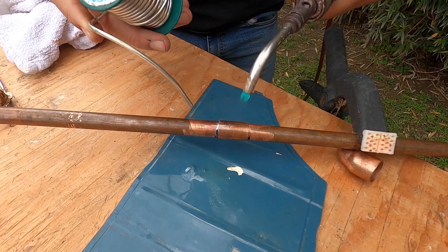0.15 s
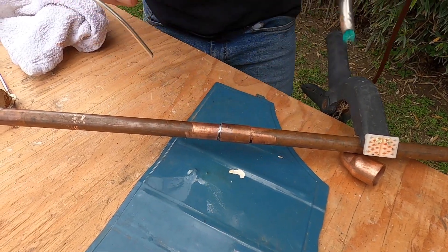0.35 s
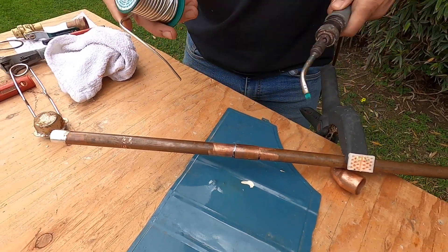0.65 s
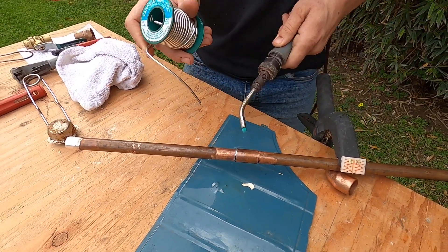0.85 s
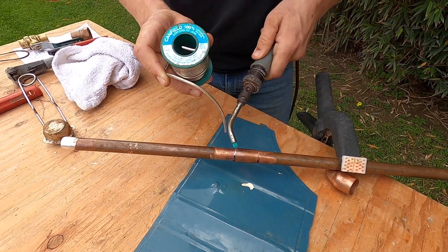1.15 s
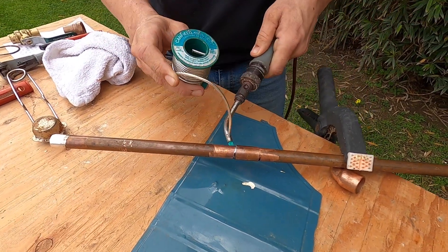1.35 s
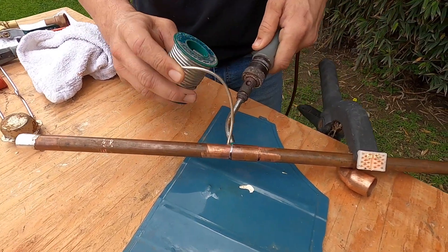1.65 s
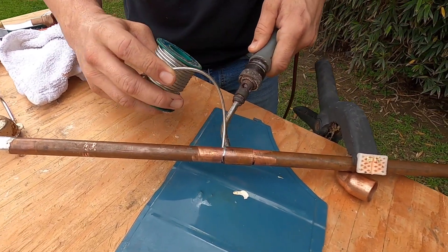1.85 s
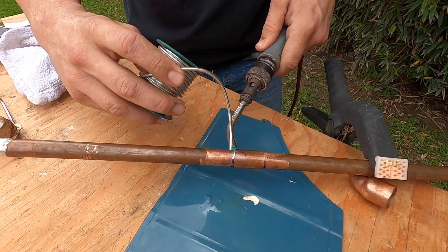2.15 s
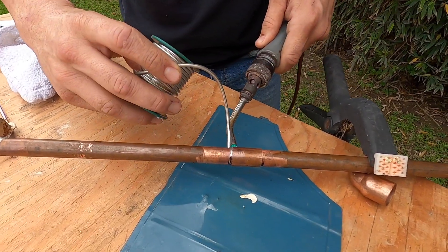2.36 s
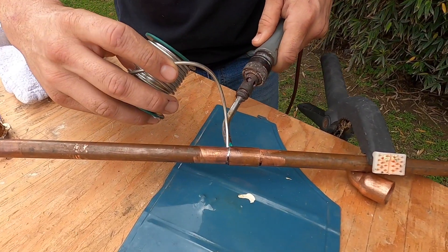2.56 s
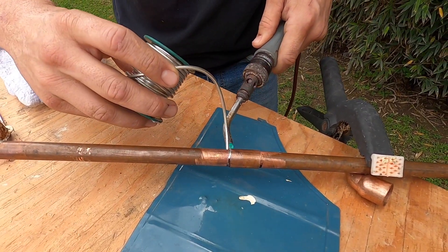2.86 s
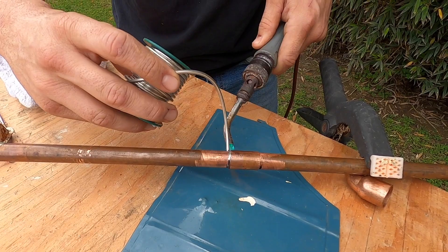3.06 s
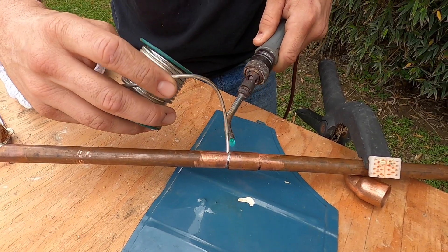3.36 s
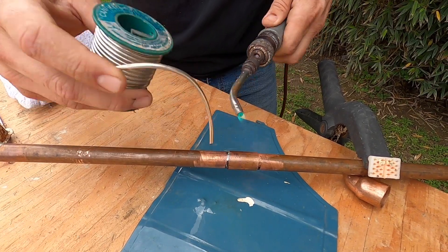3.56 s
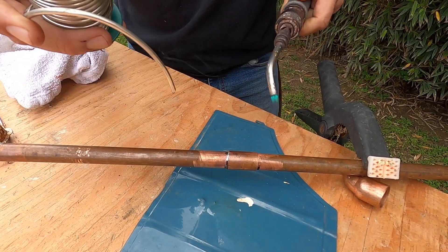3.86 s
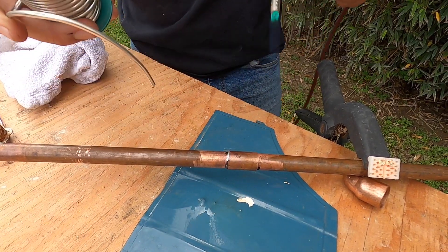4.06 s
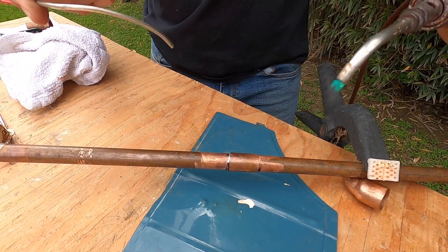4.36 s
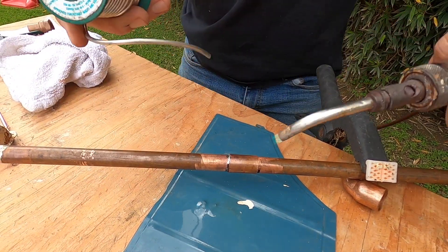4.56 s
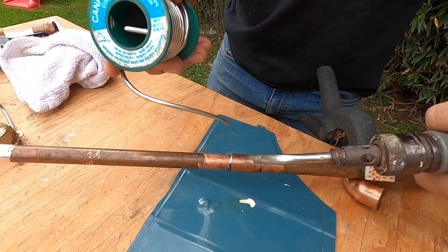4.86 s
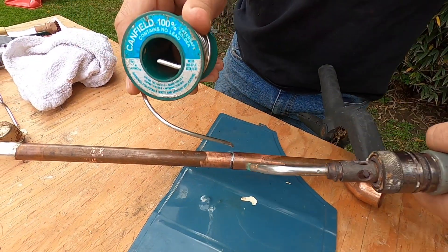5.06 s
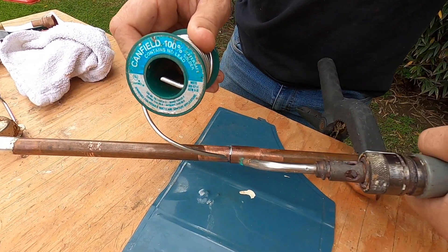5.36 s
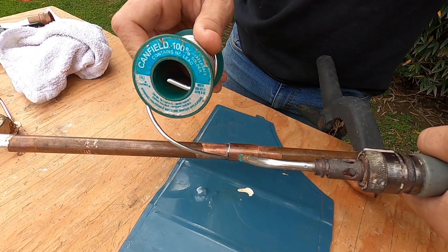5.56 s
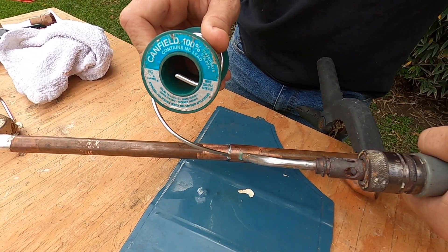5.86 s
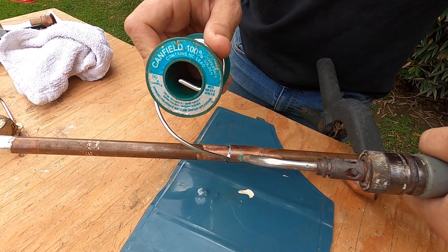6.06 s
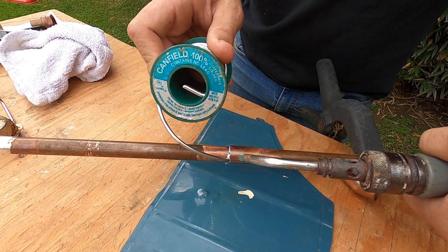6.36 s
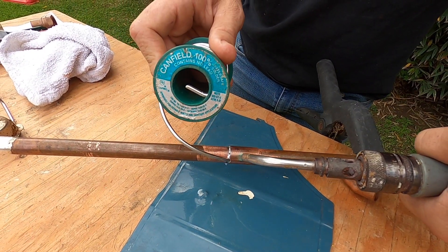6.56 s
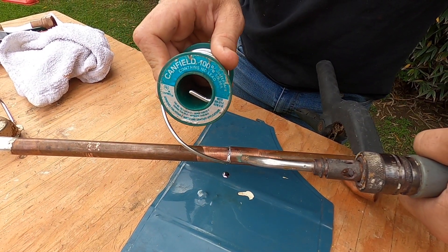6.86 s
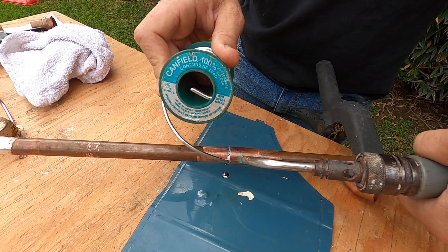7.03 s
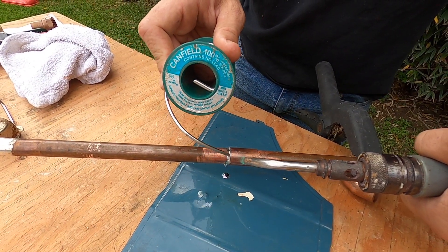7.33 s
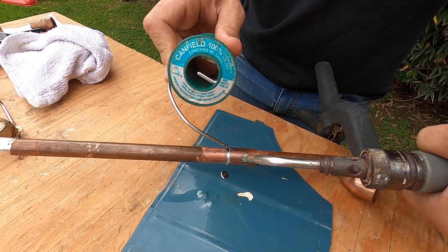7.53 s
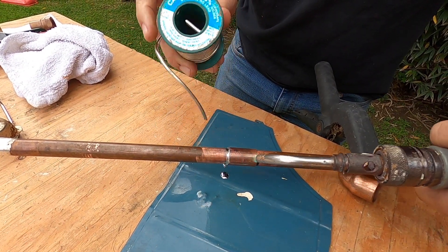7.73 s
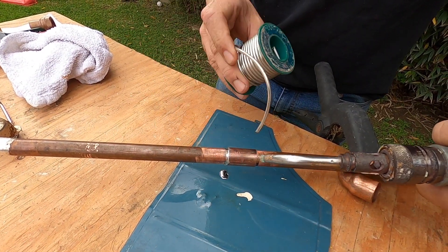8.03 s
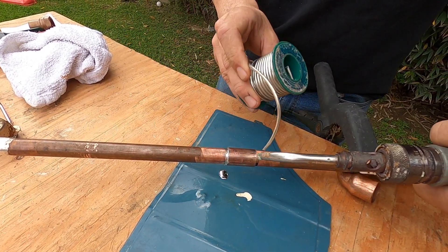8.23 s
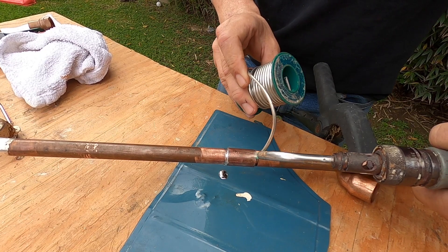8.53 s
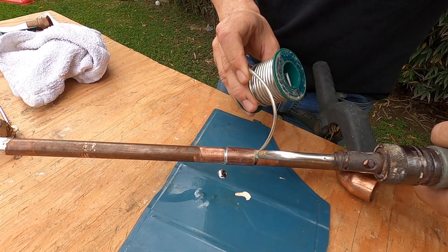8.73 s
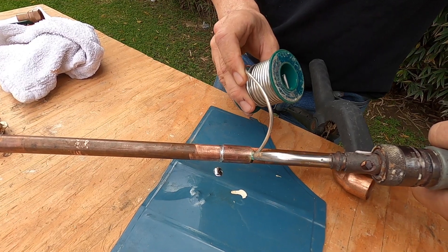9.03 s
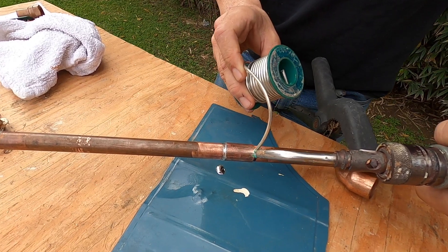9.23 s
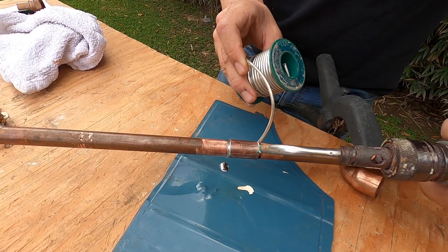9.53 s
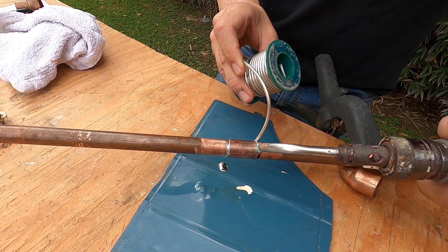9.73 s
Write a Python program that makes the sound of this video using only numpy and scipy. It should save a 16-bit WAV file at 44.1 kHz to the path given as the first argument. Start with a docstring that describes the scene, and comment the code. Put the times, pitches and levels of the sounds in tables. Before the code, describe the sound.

A gas torch hisses steadily while heating a copper pipe outdoors, its hollow tone shifting as it moves.

```python
"""Outdoors at a plywood bench, a gas torch heats a copper pipe joint.
The jet hisses and whistles through the resonances of the burner tube, shifting between hollow
colourings; its echo off the bench sweeps a comb through the hiss whenever the torch is lifted.
The flame puffs as it moves through the air and roars when held on the pipe. A light breeze
rumbles on a pair of close microphone ports."""
import sys
import numpy as np
from scipy import signal
from scipy.fft import rfft, irfft
from scipy.io import wavfile
from scipy.ndimage import map_coordinates

SR = 44100
rng = np.random.default_rng(int(sys.argv[2]) if len(sys.argv) > 2 else 0)


def generate_wav(signal):
    """Clip the signal to [-1, 1] and save it as 16-bit WAV at the path in sys.argv[1]."""
    frames = np.transpose(np.atleast_2d(signal))
    scaled = np.clip(frames, -1, 1) * 32767
    pcm = np.round(scaled).astype(np.int16)
    wavfile.write(sys.argv[1], SR, pcm)


N = 436149
TIME = np.arange(N) / SR
HZ = np.maximum(np.fft.rfftfreq(N, 1 / SR), 1)


def from_db(db):
    """Decibels to gain."""
    return 10 ** (np.asarray(db) / 20)


def in_time(rows):
    """Breakpoints to automation curves, one per column after the time."""
    times, *columns = np.transpose(rows)
    return [np.interp(TIME, times, column) for column in columns]


def over_hz(points):
    """Breakpoints joined by straight lines on a log-frequency axis."""
    hz, value = np.transpose(points)
    return np.interp(np.log(HZ), np.log(hz), value)


def peaks_db(rows):
    """An EQ curve of bells from (centre [Hz], width [Hz], gain [dB])."""
    return sum(db / (1 + (2 * (HZ - hz) / width) ** 2) for hz, width, db in rows)


def filtered(x, gain):
    """Apply a gain per frequency."""
    return irfft(rfft(x) * gain, N)


def delayed(x, lag_ms):
    """A moving delay on both channels."""
    read_at = np.arange(N) - lag_ms * SR / 1000
    return np.array([map_coordinates(side, [read_at], order=3, mode="nearest") for side in x])


def drift(rate_hz):
    """A smooth random wobble with a standard deviation of 1."""
    hop, settle = 40, 2000
    pole = np.exp(-2 * np.pi * rate_hz * hop / SR)
    white = rng.standard_normal(N // hop + settle + 2)
    slow = signal.lfilter([1], [1, -2 * pole, pole * pole], white)[settle:]
    return np.interp(np.arange(N) / hop, np.arange(len(slow)), slow / slow.std())


def turbulence(density_db):
    """Noise of a given level per Hz at both ports, partly shared and partly scattered."""
    # how alike the two ports sound: (frequency [Hz], correlation [0-1])
    likeness = [(60, .9), (450, .98), (1500, .97), (3000, .92), (4000, .9), (4400, .76), (5400, .88),
                (5800, .82), (6200, .998), (6850, .998), (7400, .5), (8200, .65), (10500, .55), (13000, .3)]
    alike = np.clip(over_hz(likeness), 0, .998)
    shared, scattered = rfft(rng.standard_normal((2, N))) * np.sqrt(SR / 2) * from_db(density_db)
    mid = np.sqrt((1 + alike) / 2) * shared
    side = np.sqrt((1 - alike) / 2) * scattered
    return irfft(np.array([mid + side, mid - side]), N)


def jet(body_db, hiss_db, split_hz=4000, air_hz=9500):
    """Gas turbulence coloured by the burner tube, split into a flickering body and a fluttering hiss."""
    # spectrum of the free jet: (frequency [Hz], level [dB])
    spectrum = [(360.0, -95.5), (560.0, -84.5), (900.0, -84), (1150.0, -81.5), (2100.0, -77.6),
                (2700.0, -76.5), (3400.0, -74.5), (4500.0, -79), (5600.0, -78), (6200.0, -86.5),
                (6800.0, -78), (8000.0, -86.5), (11000.0, -98.5), (14500.0, -109.5)]
    # peaks and dips of the burner tube: (centre [Hz], width [Hz], gain [dB])
    burner = [(1075, 50, 2), (1531, 237, 7), (1705, 157, -11), (1970, 230, 3.5), (3750, 540, 2),
              (4190, 395, -7.5), (5944, 440, 10.5), (6510, 290, -10), (8000, 144, 1.5)]
    flicker_db, flutter_db, air_flutter_db = .5, .9, 1.9
    gas = turbulence(over_hz(spectrum) + peaks_db(burner))
    hiss = filtered(gas, 1 / (1 + (split_hz / HZ) ** 3))
    body = gas - hiss
    # the highest hiss flutters quickly in level
    air = filtered(hiss, 1 / (1 + (air_hz / HZ) ** 8))
    hiss += air * (from_db(air_flutter_db * drift(9.2)) - 1)
    body *= from_db(body_db + flicker_db * drift(15))
    hiss *= from_db(hiss_db + flutter_db * drift(8.3))
    return body + hiss


def wrist_turns():
    """Level rides in dB for hiss and body: the treble beams forward, so it follows the nozzle's aim."""
    # brief turns to or from the microphone: (time [s], half length [s], hiss [dB], body [dB])
    turns = [(0.222, 0.56, 2, -0.3), (0.575, 0.091, -17, -1), (0.804, 0.14, -0.3, -5),
             (0.977, 0.26, -4.5, 1.3), (1.907, 0.26, 1, -1.3), (2.545, 0.149, -4, 0),
             (3.709, 0.35, -6.5, 1.7), (4.024, 0.38, 4.7, -1), (4.32, 0.22, -8.8, -0.3),
             (4.598, 0.05, -6.5, 0.5), (5.04, 0.13, -3, 1.5), (6.632, 0.18, -11, 0.5),
             (7.096, 0.072, -5.5, 0.8), (9.392, 0.618, 0, -0.85)]
    return sum(np.outer([hiss_db, body_db], np.exp(-((TIME - at) / half_length) ** 2))
               for at, half_length, hiss_db, body_db in turns)


def hollow_colour(flame, first_share, second_share):
    """Two sets of peaks and dips fade in and out of the hiss and make it sound hollow."""
    # the two colourings: (centre [Hz], width [Hz], gain in the first [dB], gain in the second [dB])
    colourings = [(1164, 136, 4, -6.5), (1736, 160, 7.5, -5.5), (2250, 200, 6, -5.5), (2540, 660, -5, 6.5),
                  (3152, 540, -5.5, -10), (4370, 385, 10.0, 5.5), (5000.0, 270, -0.5, 3),
                  (5790, 470, -3, -7), (7660, 750, -11, 4), (8680, 110, 13.5, -6.2)]
    hz, width, first_db, second_db = np.transpose(colourings)
    for share, db in ((first_share, first_db), (second_share, second_db)):
        hollow = filtered(flame, from_db(peaks_db(zip(hz, width, db))))
        flame = flame + share * (hollow - flame)
    return flame


def bench_echo(flame, lag_ms, strength, high_lag_ms=.55, rebound=.5):
    """The board's echo combs the hiss; a higher torch gives a duller echo and lower notches."""
    lowered_hz, lifted_hz = 5640, 2600  # low-pass corners
    lifted = np.clip(lag_ms / high_lag_ms, 0, 1) ** 2

    def bounce(sound):
        """One return from the board."""
        bright, dull = (filtered(sound, 1 / np.sqrt(1 + (HZ / corner) ** 4))
                        for corner in (lowered_hz, lifted_hz))
        return strength * delayed(bright + lifted * (dull - bright), lag_ms)

    echo = bounce(flame)
    return echo - rebound * bounce(echo)  # goes round once more, inverted


def nearby_echoes(flame, low_cut_hz=1500):
    """Two small surfaces return only the treble; their fine combs drift as the torch moves."""
    # echoes off things such as the hand and the solder spool:
    # (time [s], first lag [ms], first strength [0-1], second lag [ms], second strength [0-1])
    reflections = [(0.0, 1.132, 0.25, 0.528, 0.03), (0.3, 1.134, 0.13, 0.651, 0.19),
                   (0.55, 1.096, 0.04, 0.643, 0.1), (0.8, 1.289, 0.12, 0.627, 0.1),
                   (1.0, 1.239, 0.07, 1.346, 0.09), (1.2, 0.614, 0.25, 1.479, 0.2),
                   (1.45, 0.688, 0.09, 1.466, 0.26), (1.7, 1.016, 0.16, 1.507, 0.14),
                   (2.0, 1.121, 0.13, 1.515, 0.02), (2.3, 0.836, 0.11, 1.572, 0.14),
                   (2.6, 0.839, 0.03, 1.438, 0.06), (3.0, 0.843, 0.12, 1.386, 0.16),
                   (3.4, 0.697, 0.05, 1.371, 0.17), (3.65, 0.768, 0.13, 1.413, 0.04),
                   (3.9, 0.646, 0.08, 1.448, 0.05), (4.15, 0.648, 0.14, 1.345, 0.12),
                   (4.3, 0.662, 0.11, 1.296, 0.21), (4.55, 0.601, 0.11, 1.264, 0.14),
                   (4.8, 0.467, 0.27, 1.265, 0.06), (5.1, 0.403, 0.11, 1.206, 0.05),
                   (5.5, 0.582, 0.14, 1.023, 0.0), (6.1, 0.607, 0.03, 0.77, 0.11),
                   (6.6, 0.76, 0.16, 0.747, 0.08), (7.15, 0.707, 0.18, 0.433, 0.1),
                   (7.7, 0.758, 0.0, 0.493, 0.14), (8.4, 1.155, 0.07, 0.871, 0.0),
                   (9.3, 1.132, 0.07, 0.858, 0.11), (9.89, 1.002, 0.07, 0.669, 0.13)]
    first_ms, first_strength, second_ms, second_strength = in_time(reflections)
    treble = filtered(flame, 1 / (1 + (low_cut_hz / HZ) ** 2))
    return first_strength * delayed(treble, first_ms) + second_strength * delayed(treble, second_ms)


def whistles():
    """The burner tube sings in three noise bands from air holes that face or leave the microphone."""
    # breathy whistles: (centre [Hz], half width [Hz], peak level [dB])
    bands = [(1533, 96, -78.5), (3976, 94, -74.5), (5380, 63, -70.5)]
    # how strongly they carry: (time [s], gain of the lower two [dB], gain of the top one [dB])
    carry = [(0.0, 3, -1), (0.45, 4.5, -1), (0.7, -7, -2), (1.0, 4.5, -17), (1.7, -18, -1), (2.2, -7, 1),
             (3.2, 1, 1.5), (3.8, 5, -3), (4.5, 0.7, -2), (5.3, -1.5, -0.5), (6.1, 4.8, 4.3),
             (6.6, -1, -19), (7.1, 2.5, -4.9), (7.6, 4.5, 2), (8.8, 2.5, 6), (9.89, 5, 3.5)]
    lower_db, top_db = in_time(carry)
    low, middle, top = (turbulence(db - 20 * np.log10(1 + ((HZ - hz) / half_width) ** 2))
                        for hz, half_width, db in bands)
    return (low + middle) * from_db(lower_db) + top * from_db(top_db)


def breeze(gain_db=-1.0, lumpy_db=2.5):
    """Lumpy low eddies buffet the microphone ports."""
    # rise and fall of the breeze: (time [s], level [dB])
    gusts = [(0.0, -64), (0.13, -64), (0.27, -56), (0.3, -58.5), (1.79, -65.5), (1.84, -65), (2.45, -69),
             (3.85, -62.5), (3.88, -62), (4.16, -65.5), (4.71, -56.5), (4.82, -63.5), (8.45, -66.5),
             (9.89, -70)]
    # spectrum of its rumble: (frequency [Hz], relative level [dB])
    rumble = [(15, -3), (30, -35), (55, 8), (100, 3), (190, 4), (300, 1.5), (600, -41), (6000, -78)]
    level_db, = in_time(gusts)
    eddies = turbulence(over_hz(rumble))
    return eddies / eddies.std() * from_db(gain_db + level_db + lumpy_db * drift(7.3))


def puffs(half_width_octaves=0.96):
    """Moved through the air, the flame gives short swells of low turbulence."""
    # soft puffs: (time [s], centre [Hz], level [dB], half length [s])
    swells = [(0.259, 110, -51, .026), (0.417, 119.8, -72, 0.16), (0.536, 86, -55, 0.046),
              (.84, 180, -57, 0.034), (.98, 170, -59, .045), (1.222, 65, -65, .12), (1.947, 60, -56, 0.069),
              (3.892, 147, -48.5, 0.019), (4.476, 136, -58.5, 0.12), (4.69, 140, -81, 0.033),
              (5.112, 170, -63, 0.26)]
    out = np.zeros(N)
    for at, hz, db, half_length in swells:
        band = np.exp(-(np.log2(HZ / hz) / half_width_octaves) ** 2)
        eddy = filtered(rng.standard_normal(N), band)
        out += eddy / eddy.std() * from_db(db) * np.exp(-((TIME - at) / half_length) ** 2)
    return out


def pipe_contact(edge_s=0.016):
    """How fully the flame lies on the pipe, 0-1: each touch slides on, holds and slides off."""
    # the flame is held on the pipe: (start [s], end [s], depth of contact [dB])
    touches = [(1.05, 2.703, -17.5), (5.08, 5.2, -10), (5.49, 5.663, -7.5), (5.678, 6.19, -15),
               (6.193, 7.5, -4), (8.322, 8.518, -5)]
    return sum(from_db(db) * (np.tanh((TIME - start) / edge_s) - np.tanh((TIME - end) / edge_s)) / 2
               for start, end, db in touches)


def roar(on_pipe, lag_ms, free_db=-16, lift_db_per_ms=-13, sputter_db=1.2):
    """The flame breaks up on the pipe and burns roughly; its faint free roar fades as it is lifted."""
    # spectrum of the roar: (frequency [Hz], level [dB])
    spectrum = [(60, -115), (200, -81.5), (380, -83.5), (550, -74), (750, -70), (1050, -76), (1600, -80.5),
                (3500, -100), (14000, -140)]
    free = from_db(free_db + lift_db_per_ms * lag_ms)
    return turbulence(over_hz(spectrum)) * (free + on_pipe) * from_db(sputter_db * drift(19))


def scene():
    """Height, turns and contact shape the torch; echoes, whistles, roar, puffs and breeze join in."""
    # torch height, heard in its echo off the bench: (time [s], lag [ms], echo strength [0-1])
    height = [(0.0, 0.168, 0.49), (0.11, 0.18, 0.44), (0.29, 0.28, 0.4), (0.34, 0.38, 0.28),
              (0.47, 0.58, 0.5), (0.59, 0.29, 0.5), (0.63, 0.26, 0.5), (0.8, 0.262, 0.52),
              (0.88, 0.166, 0.59), (0.96, 0.111, 0.49), (1.03, 0.108, 0.3), (1.65, 0.066, 0.51),
              (2.12, 0.099, 0.58), (2.7, 0.116, 0.68), (3.42, 0.13, 0.55), (3.58, 0.195, 0.4),
              (3.73, 0.275, 0.42), (3.82, 0.24, 0.46), (3.88, 0.15, 0.6), (3.93, 0.14, 0.35),
              (4.03, 0.25, 0.5), (4.1, 0.32, 0.5), (4.13, 0.42, 0.48), (4.32, 0.59, 0.52),
              (4.4, 0.575, 0.48), (4.59, 0.41, 0.28), (4.72, 0.275, 0.42), (4.9, 0.21, 0.65),
              (5.06, 0.185, 0.59), (5.41, 0.166, 0.6), (5.58, 0.141, 0.42), (6.2, 0.161, 0.35),
              (6.54, 0.124, 0.42), (7.06, 0.131, 0.55), (7.52, 0.154, 0.4), (7.84, 0.185, 0.53),
              (9.09, 0.188, 0.54), (9.49, 0.173, 0.7), (9.89, 0.151, 0.72)]
    # how much of two hollow colourings the hiss carries, strongest near the pipe:
    # (time [s], share of the first [0-1], share of the second [0-1])
    hollowness = [(0.85, 0.4, 0.0), (1.23, 0.25, 0.1), (2.0, 1.0, 0.07), (2.35, 0.87, 0.76),
                  (2.61, 1.0, 0.9), (3.42, 0.74, 0.85), (3.62, 0.16, 0.2), (4.78, 0.27, 0.1),
                  (5.25, 0.06, 0.49), (6.5, 0.37, 0.48), (7.5, 0.18, 0.4), (7.89, 0.08, 1),
                  (9.89, 0.14, 0.9)]
    lag_ms, echo_strength = in_time(height)
    first_share, second_share = np.clip(in_time(hollowness), 0, 1)
    on_pipe = pipe_contact()
    hiss_turn_db, body_turn_db = wrist_turns()
    lift_db = 3 * lag_ms  # lifting brings the body nearer the microphone
    # the first colouring trades hiss for body; contact ducks the body a little
    body_db = 0.08 + 1.5 * first_share - 1.1 * on_pipe + lift_db + body_turn_db
    hiss_db = 0.5 - 4.5 * first_share + hiss_turn_db
    flame = hollow_colour(jet(body_db, hiss_db), first_share, second_share)
    echoes = bench_echo(flame, lag_ms, echo_strength) + nearby_echoes(flame)
    return flame + echoes + whistles() + roar(on_pipe, lag_ms) + puffs() + breeze()


def record(dry, cutoff_hz=14800):
    """Each microphone port has its own colour and delay; a steep low-pass cuts the top."""
    # stereo tilt of the ports: (frequency [Hz], left minus right [dB])
    balance = [(60, 3), (200, 0.9), (600, -1.7), (1400, -.7), (3000, 1.2), (5000, 1.5), (6200, 0),
               (6850, 0), (7400, -8), (8800, -2), (10500, -5.5), (12200, -10), (14500, -2)]
    # phase between the ports: (frequency [Hz], lead of the left [rad])
    port_phase = [(20, 0), (250, -.25), (1300, -.4), (2500, -.75), (4000, -1.3), (5300, -1.8), (5900, -2.6),
                  (6200, -3.13), (6850, -3.15), (7350, -3.6), (7700, -1.1), (8700, -1.1), (9300, -2.3),
                  (11200, -3.1), (12200, -7), (14000, -9.3)]
    sides = np.array([[.5], [-.5]])
    colour = from_db(sides * over_hz(balance))
    colour /= np.sqrt(np.mean(colour ** 2, axis=0))  # constant power
    ports = filtered(dry, colour * np.exp(1j * sides * over_hz(port_phase)))
    low_pass = signal.ellip(10, .1, 80, cutoff_hz, fs=SR, output="sos")
    return signal.sosfilt(low_pass, ports)


dry = scene()
out = record(dry)
generate_wav(out)
```